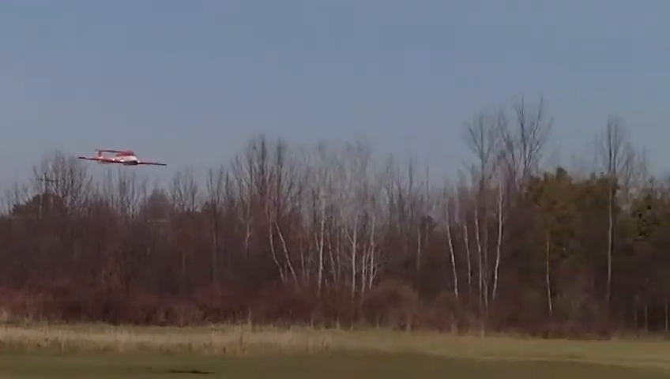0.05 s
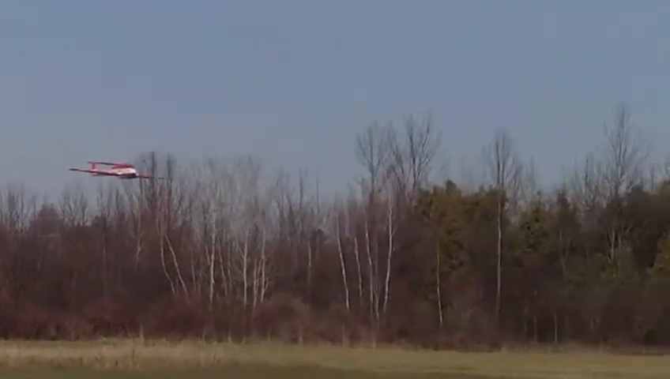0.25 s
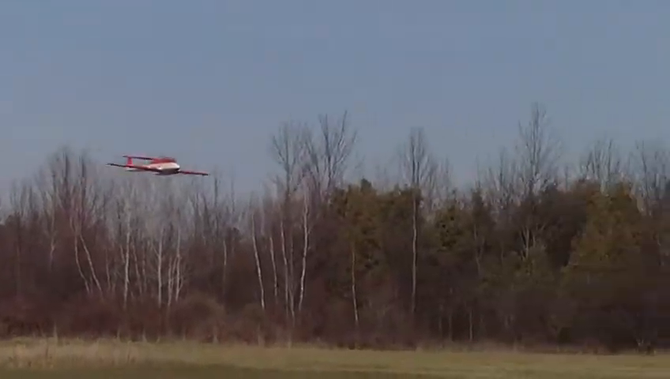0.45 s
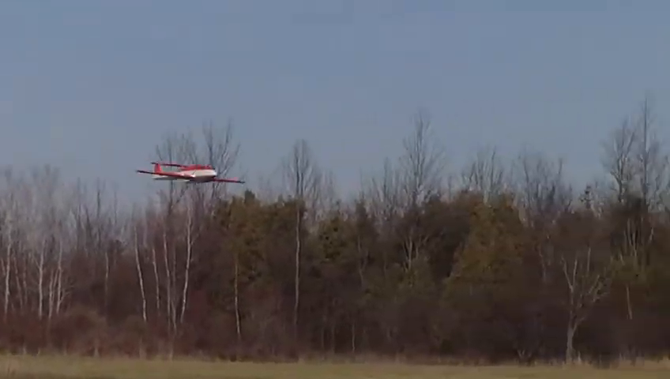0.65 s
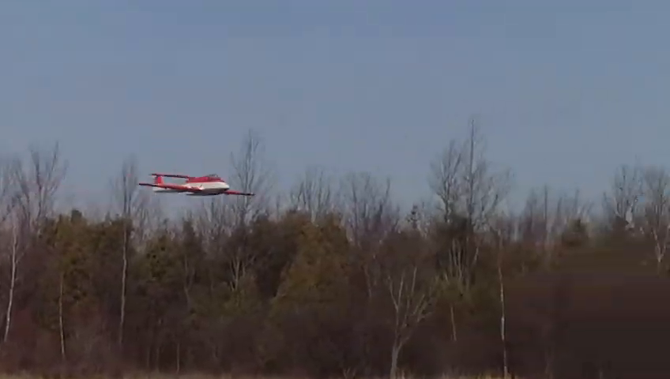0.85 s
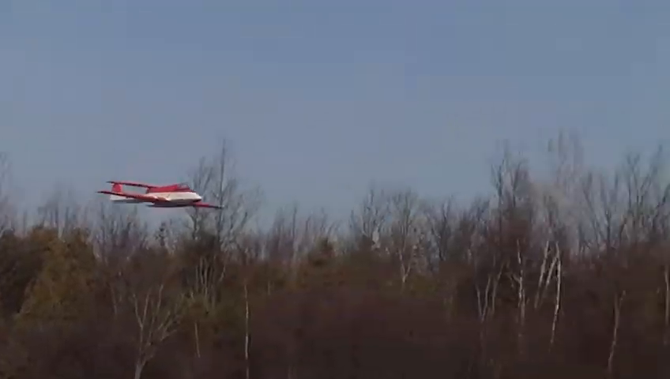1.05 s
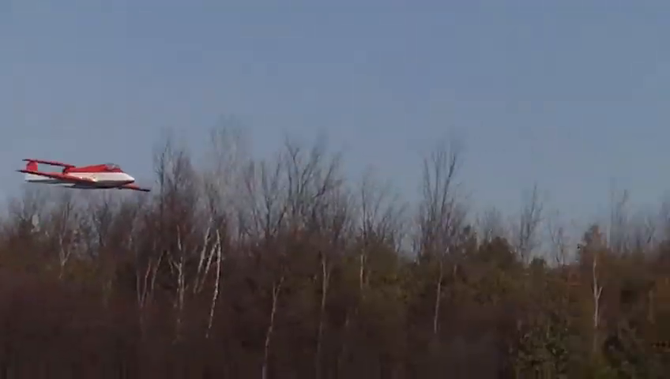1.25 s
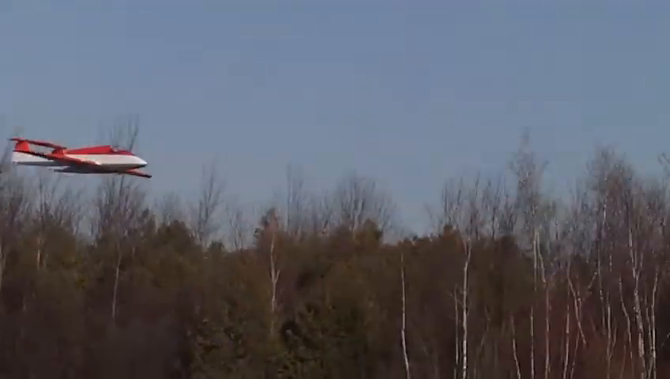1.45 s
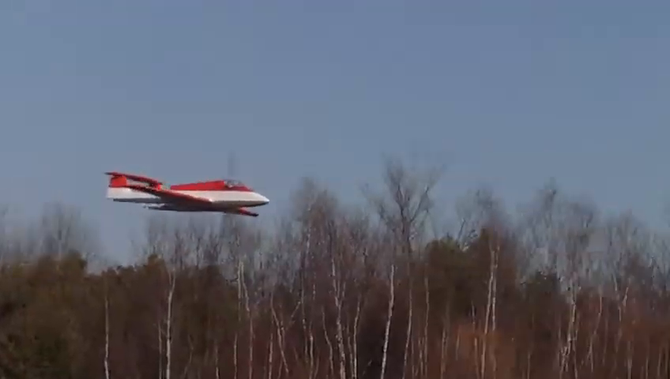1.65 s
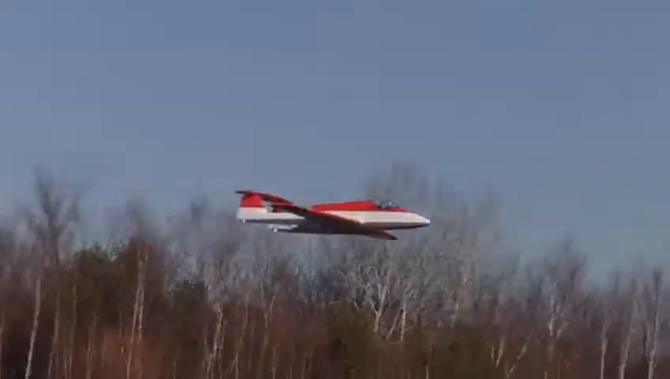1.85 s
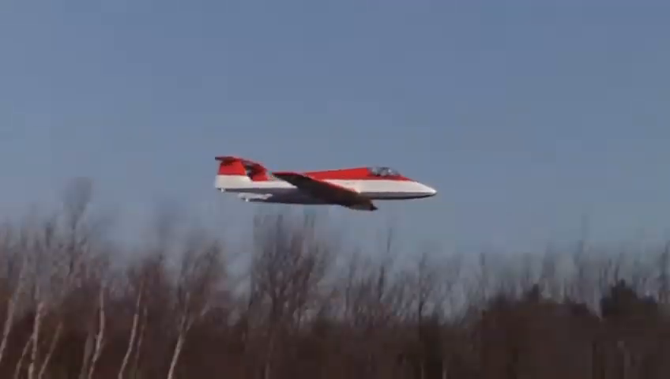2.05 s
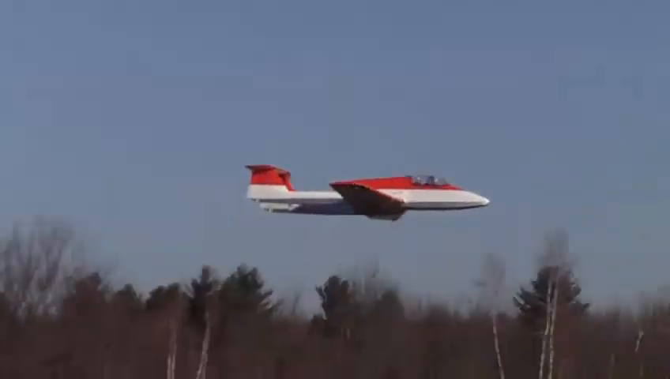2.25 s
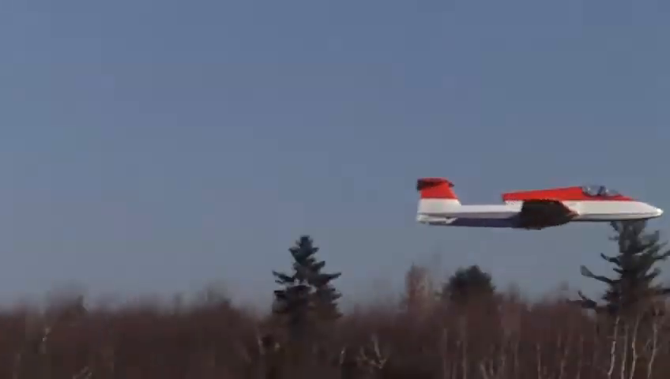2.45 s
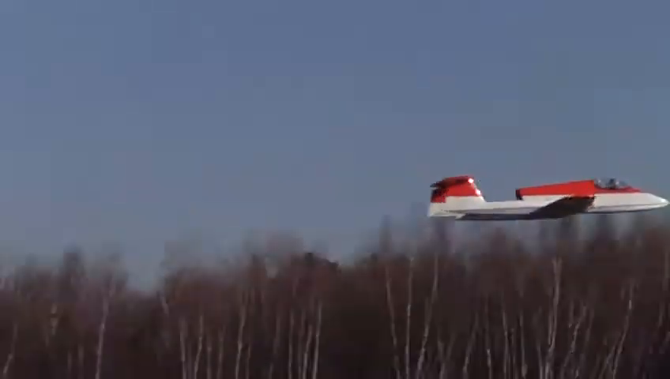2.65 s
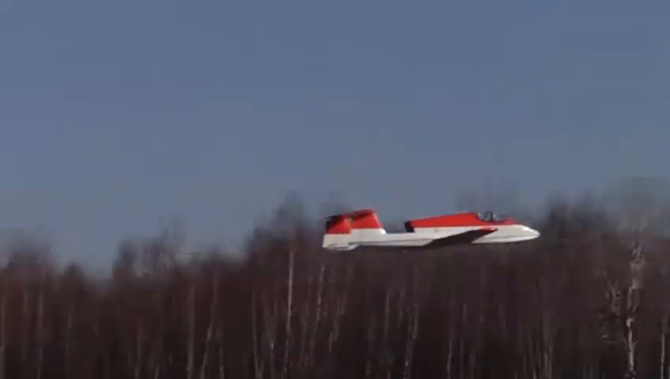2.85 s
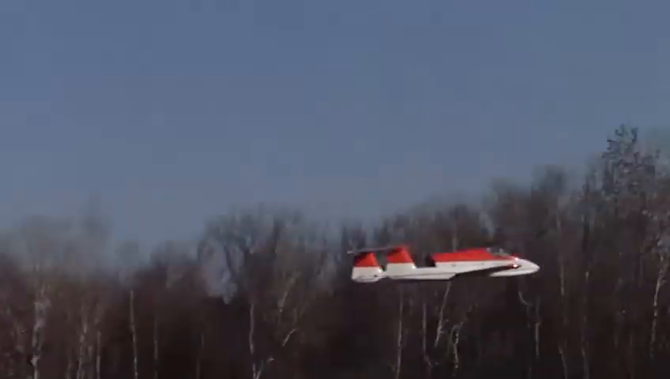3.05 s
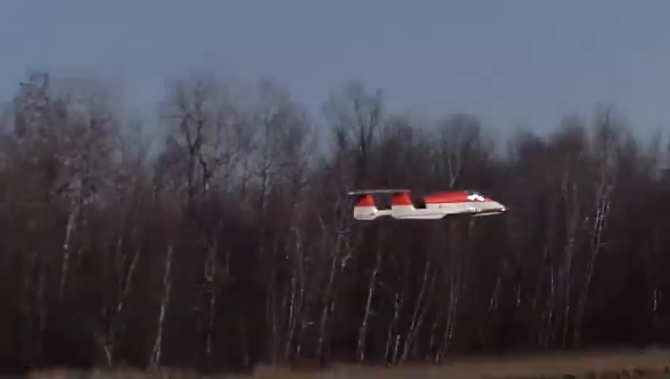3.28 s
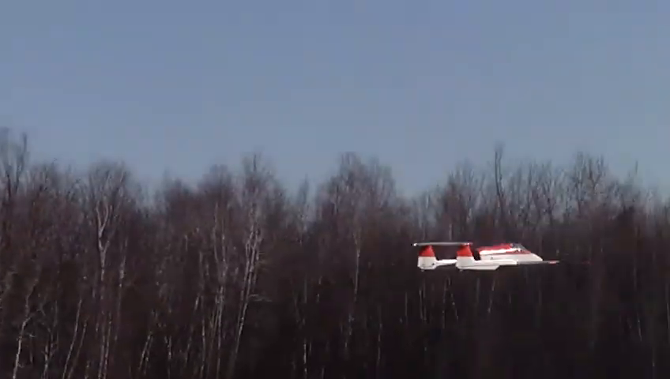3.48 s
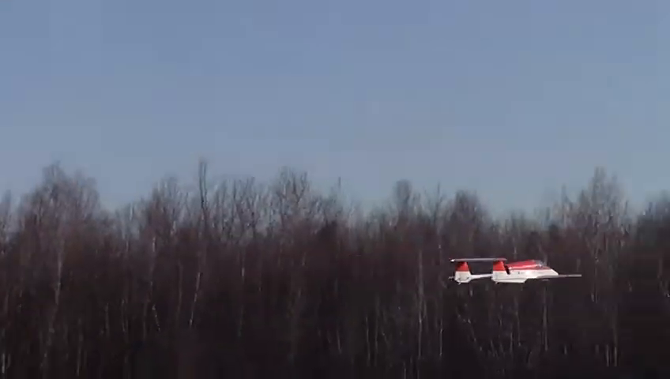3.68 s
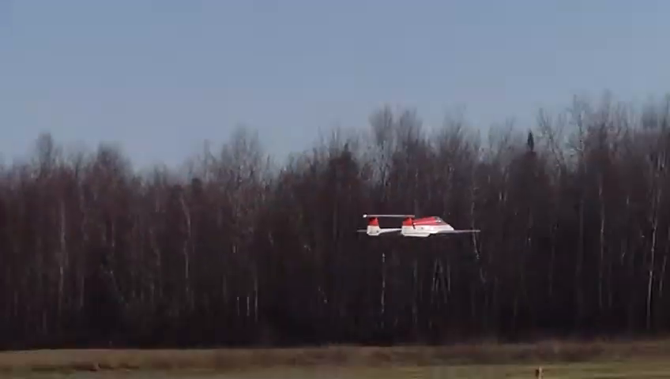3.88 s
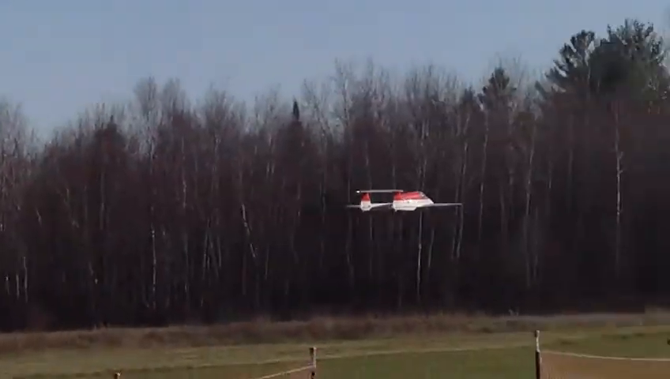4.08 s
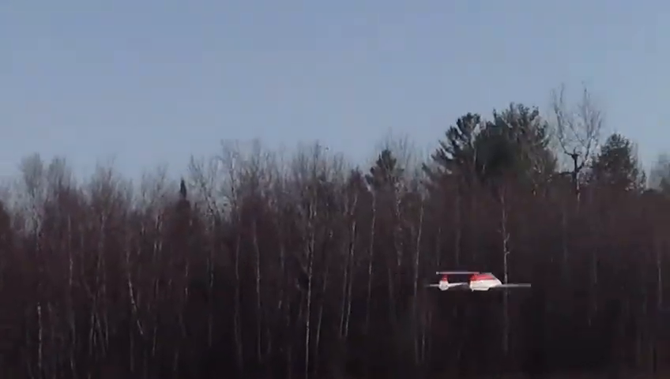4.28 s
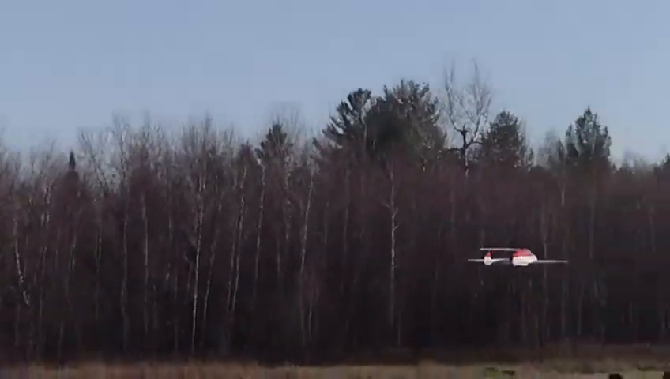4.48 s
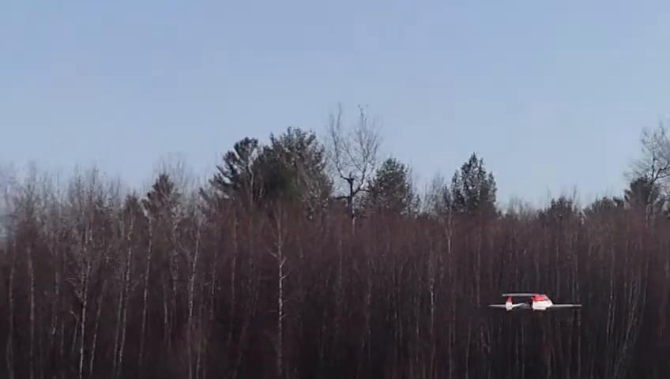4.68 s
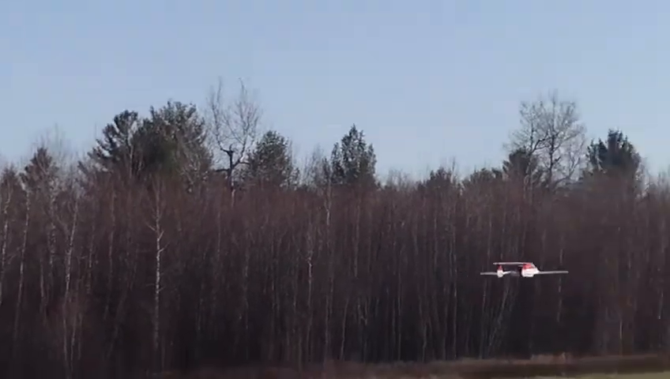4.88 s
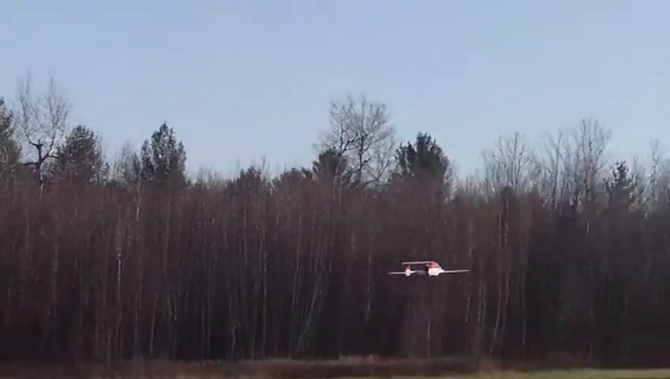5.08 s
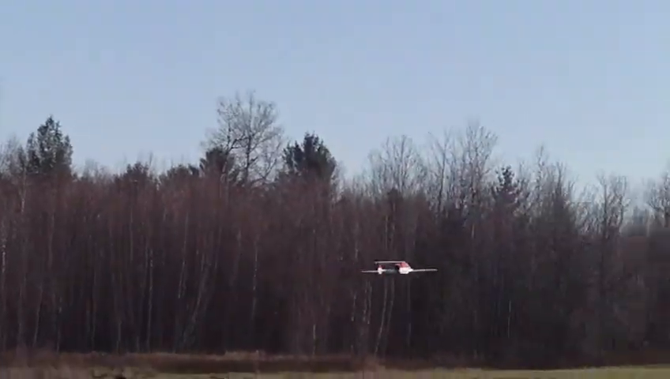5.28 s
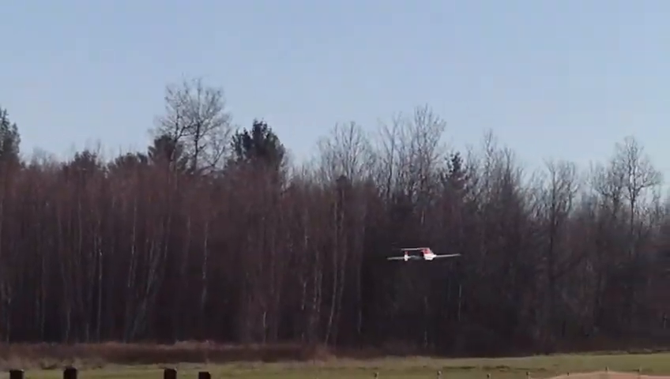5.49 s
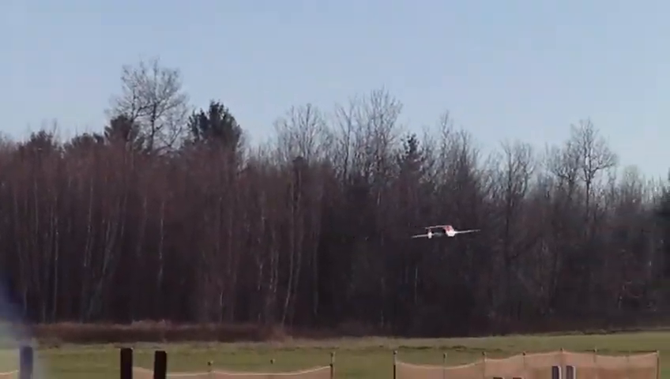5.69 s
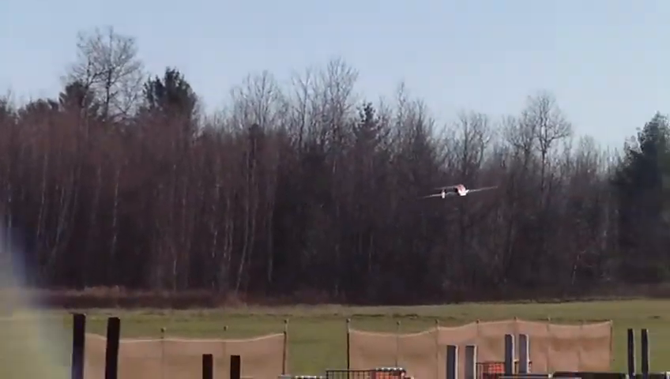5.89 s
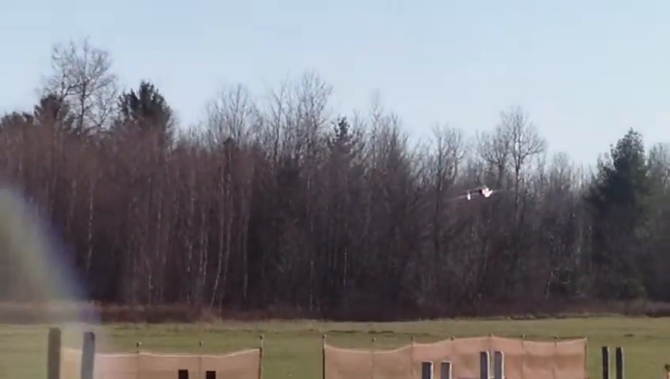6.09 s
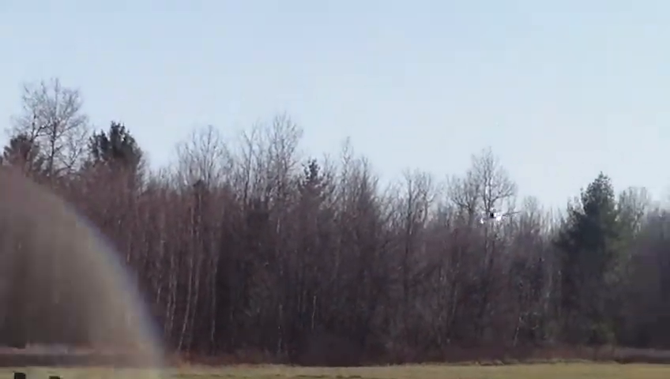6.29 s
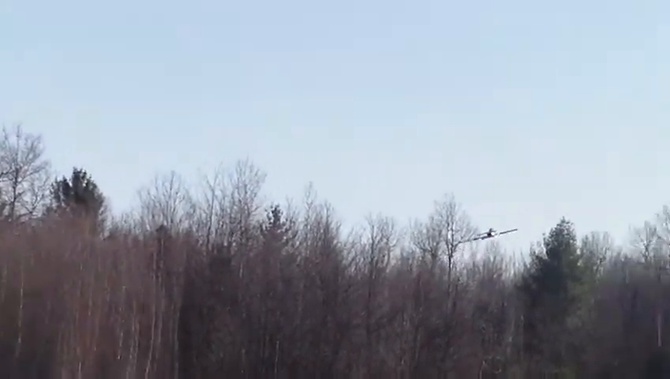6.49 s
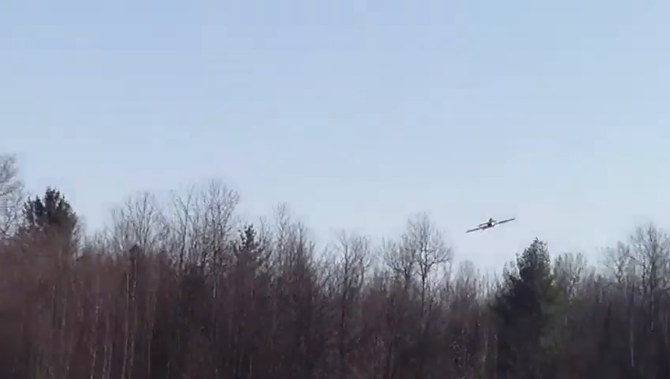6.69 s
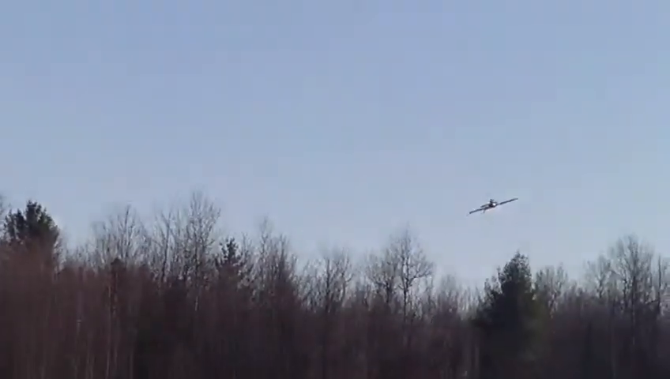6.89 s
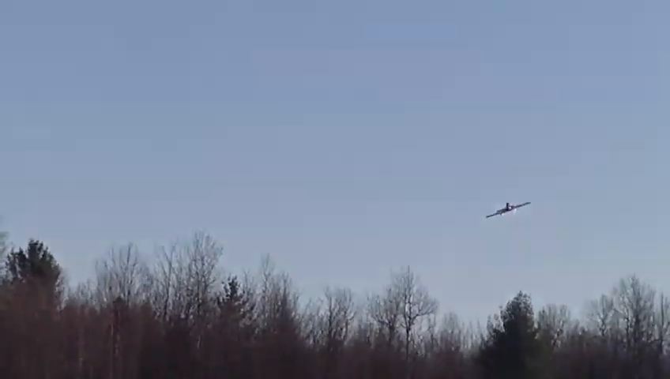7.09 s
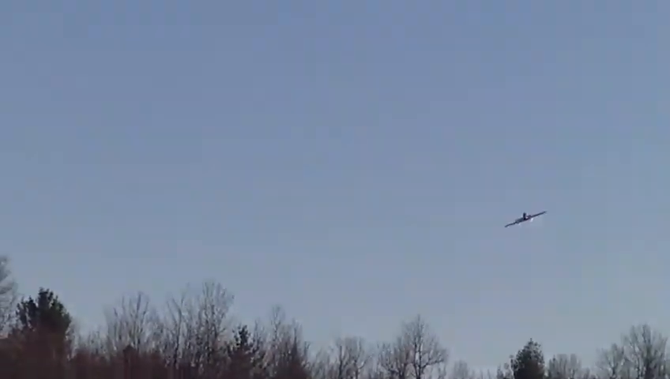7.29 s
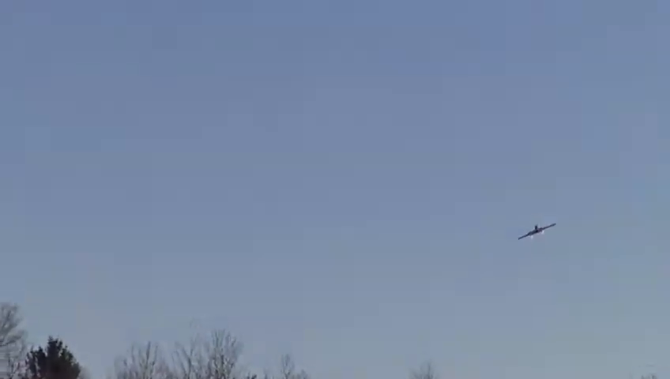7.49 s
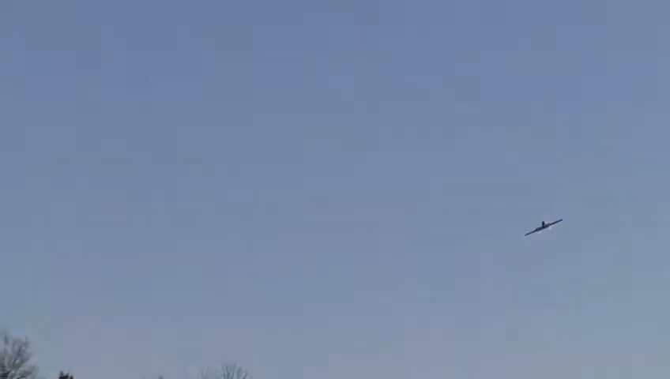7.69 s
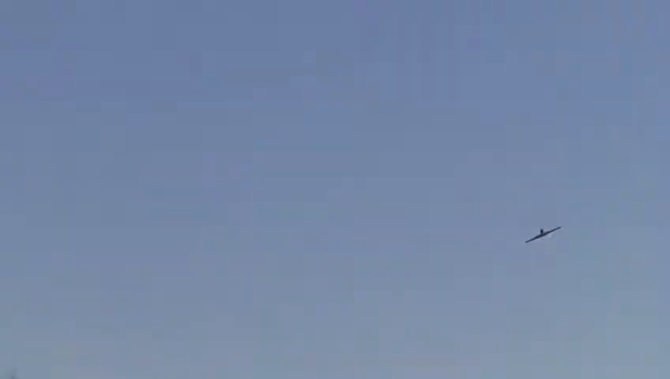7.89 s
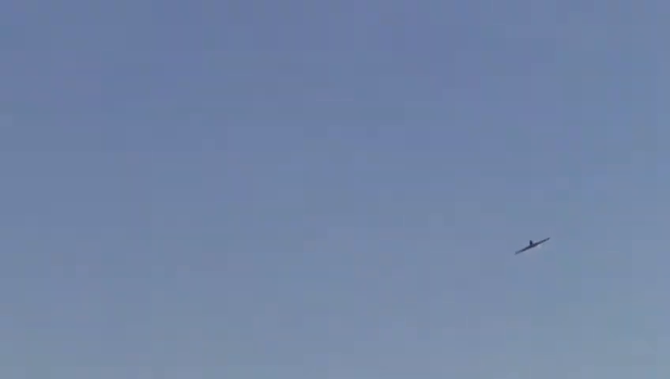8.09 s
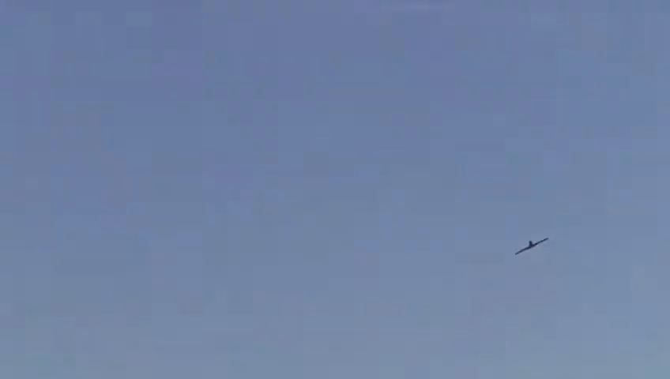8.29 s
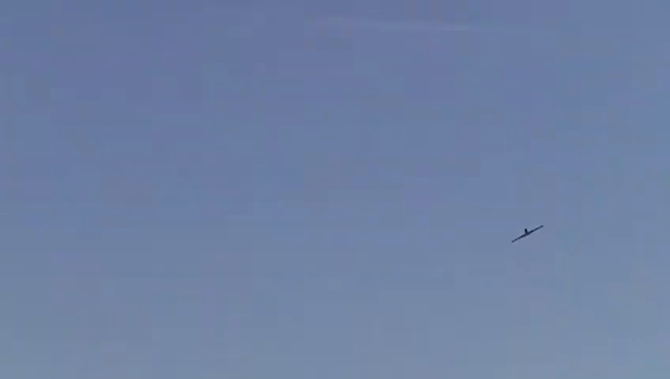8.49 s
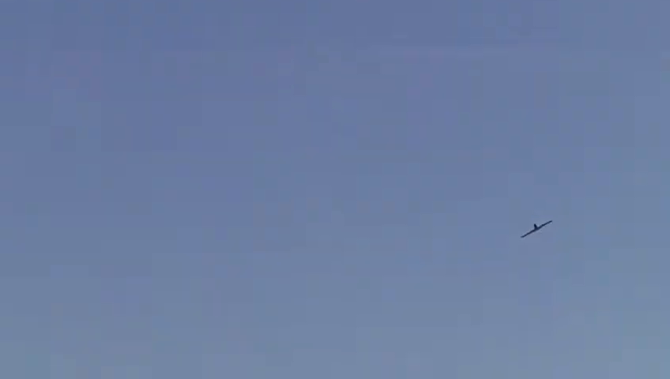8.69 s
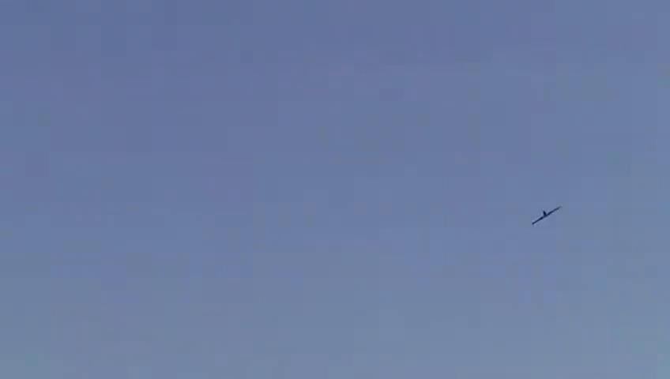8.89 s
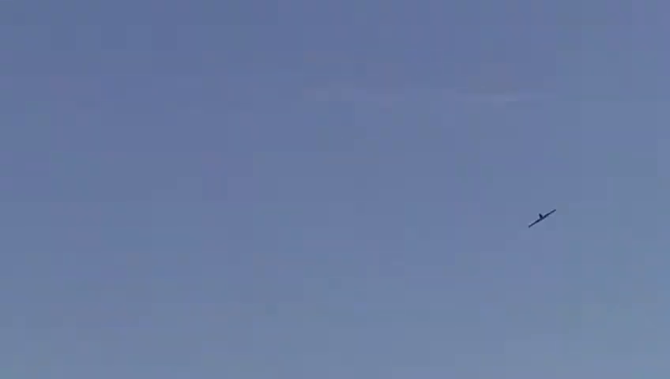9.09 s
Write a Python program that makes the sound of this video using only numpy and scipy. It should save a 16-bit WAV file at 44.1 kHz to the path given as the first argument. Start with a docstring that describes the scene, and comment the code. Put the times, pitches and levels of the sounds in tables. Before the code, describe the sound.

Faint whine swells into a hoarse, hollow jet rush passing close, then recedes to a dull roar among handling ticks and low wind thumps.

```python
"""Over an open field, a model turbine jet makes a low pass and climbs away.
Its exhaust rush is shaped noise that sweeps against its own ground echo; fine hiss comes on top while it is close.
The shaft and the thin compressor whine are sine tones that waver in pitch and strength.
The hand-held camera that follows it ticks as short ringing tones, with soft noise swishes, whistles and hiss.
Wind bumps its microphone as lumpy low noise."""
import sys
import numpy as np
from scipy import signal
from scipy.fft import rfft, irfft, next_fast_len
from scipy.io import wavfile
from scipy.ndimage import uniform_filter1d

SR = 44100
rng = np.random.default_rng(int(sys.argv[2]) if len(sys.argv) > 2 else 0)


def generate_wav(sig):
    """Save sig (samples, or channels by samples) to the path in sys.argv[1] as 16-bit PCM at SR."""
    pcm = np.round(np.clip(np.atleast_2d(sig).T, -1, 1) * 32767).astype(np.int16)
    wavfile.write(sys.argv[1], SR, pcm)


N = 403322


def from_db(db):
    """Decibels to gain."""
    return 10 ** (np.asarray(db) / 20)


def rms_one(x):
    """Scale to unit power."""
    return x / np.sqrt(np.mean(x ** 2) + 1e-20)


def in_time(rows):
    """Draw straight lines between the rows of a curve table; give each column a value at every sample."""
    s, *columns = np.transpose(rows)
    return [np.interp(np.arange(N) / SR, s, c) for c in columns]


def filtered(x, response, size=4096):
    """Apply a gain that is given as a function of frequency; mirrored ends keep the edges quiet."""
    length = next_fast_len(N + 2 * size)
    hz = np.maximum(np.arange(length // 2 + 1) * SR / length, 1)
    padded = np.pad(x, (size, length - N - size), mode="reflect")
    return irfft(rfft(padded) * response(hz), length)[size:size + N]


def noise(colour):
    """Noise of unit power, whose colour table sets only how strong each pitch range is against the others."""
    points_hz, points_db = np.transpose(colour)

    def response(hz):
        return from_db(np.interp(np.log(hz), np.log(points_hz), points_db))

    return rms_one(filtered(rng.standard_normal(N), response))


def drift(rate):
    """Random wander with spread 1; a higher rate (in Hz) makes it quicker."""
    return rms_one(filtered(rng.standard_normal(N), lambda hz: 1 / (1 + (hz / rate) ** 2)))


def levelled(x, size=13001):
    """Even out changes of power that are slower than about 0.3 s."""
    return x / np.sqrt(uniform_filter1d(x ** 2, size) + 1e-20)


def swells(rows):
    """Gain of a set of smooth, bell-shaped swells."""
    t = np.arange(N) / SR
    return sum(from_db(db) * np.exp(-.5 * ((t - s) / length) ** 2) for s, length, db in rows)


def hollows(hz):
    """Bell-shaped dips in the camera's pickup."""
    # Each row: centre in Hz, half width of the bell in Hz, depth in dB
    dips = [(380, 110, -3), (1205, 72, -12.5), (1950, 135, -10), (4450, 90, -5)]
    return from_db(sum(db * np.exp(-.5 * ((hz - centre) / width) ** 2) for centre, width, db in dips))


def over_grass(x, turn, turn_hz, dull_hz, dip_octaves, air_db_per_s=0, rear_db=0):
    """The way across the field: a ground echo combs the sound, and the comb sweeps with the height of the jet."""
    # Lag of the echo behind the direct sound, longer when the jet is higher. Each row: time in seconds, lag in ms
    echo_lag = [(.45, 0.46), (.8, 0.56), (1.2, 0.83), (1.65, 0.95), (1.95, 1.21), (2.5, 1.236), (3.3, 0.93),
                (3.6, 0.64), (5.5, 0.64), (6.8, .61), (7.25, 0.81), (7.65, 1.15), (8.1, 1.217),
                (9.15, 1.64)]
    # The bass dip over soft ground. Each row: time in seconds, centre in Hz, gain in dB (mostly a loss)
    ground_dip = [(0.6, 460, 3), (1.4, 340, -0.5), (2.3, 333, -15.5), (4.0, 422, -1), (7.0, 262, -24),
                  (8.0, 201, 3)]
    echo_strength = .58  # share that the grass returns, before its loss of treble
    scatter_db, scatter_hz = 1.5, 3000  # spread reached far above scatter_hz
    leaving_s = 5.03  # from here on the tail points at the microphone and the jet draws away
    rear_hz, rear_octaves, rear_turn_s = 487, 0.76, 1.5  # the deep throat: centre, width, time to turn

    hz, s, frames = signal.stft(x, SR, nperseg=1024, noverlap=768)
    hz = np.maximum(hz, 1)[:, None]
    at = np.minimum((s * SR).astype(int), N - 1)
    lag_ms, dip_hz, dip_db = (c[at] for c in in_time(echo_lag) + in_time(ground_dip))

    # grass returns the bass upright, the treble turned in phase (by turn, in radians) and weaker
    phase = 2 * np.pi * hz * lag_ms / 10 ** 3 + turn * (1 - np.exp(-hz / turn_hz))
    echo = echo_strength * np.exp(-1j * phase) / np.hypot(1, hz / dull_hz)
    comb = np.abs(1 + echo)
    dip = dip_db * np.exp(-.5 * (np.log2(hz / dip_hz) / dip_octaves) ** 2)

    # eddies scatter the higher sound into slowly changing patches
    patches = rng.standard_normal(frames.shape)
    for _ in range(2):
        patches = uniform_filter1d(patches, size=5, axis=0)
        patches = uniform_filter1d(patches, size=45, axis=1)
    scatter = scatter_db * rms_one(patches) * hz / np.hypot(hz, scatter_hz)

    # treble loss while the jet draws away, stated at 4 kHz
    air = air_db_per_s * np.maximum(s - leaving_s, 0) * (hz / 4000) ** 2
    # the throat goes from rear_db too weak to rear_db too strong as the jet is seen more from behind
    throat = np.exp(-.5 * (np.log2(hz / rear_hz) / rear_octaves) ** 2)
    rear = rear_db * np.tanh((s - leaving_s) / rear_turn_s) * throat
    arriving = frames * comb * from_db(dip + scatter - air + rear)
    return signal.istft(arriving, SR, nperseg=1024, noverlap=768)[1][:N]


def exhaust(shared_db, own_db, flutter_hz):
    """Turbulent jet noise; uneven air makes it flutter, the higher bands most."""
    # Exhaust colour. Each row: frequency in Hz, relative strength in dB per Hz
    exhaust_colour = [(30, -36), (90, -19), (180, -8.5), (500, -7.5), (830, -1), (1300, -5), (1550, -6.5),
                      (2300, -4.5), (2750, 2.5), (3150, .5), (3550, -3.5), (4100, -13.5), (4950, -22.5),
                      (5700, -32.5), (7000, -35.5), (12000, -69)]
    # Deep part of the plume as it arrives, before flutter. Each row: time in seconds, level in dB
    plume_levels = [(0.0, -48), (1.64, -42), (2.47, -35), (3.54, -35.5), (4.93, -41), (5.86, -36),
                    (8.87, -49), (8.95, -52)]
    # The bands above it, before flutter.
    # Each row: time in seconds, low roar in dB, middle rush in dB, high rasp in dB
    exhaust_levels = [(0.0, -45, -42, -45.5), (0.99, -38, -40, -35), (1.25, -37.5, -40, -37),
                      (2.01, -26.5, -27, -28), (2.65, -24, -18.5, -18), (3.05, -22, -19.5, -16),
                      (3.23, -19.5, -21.5, -19), (3.54, -23, -17.5, -20), (3.79, -19, -18.5, -15.5),
                      (3.97, -22.5, -22, -23), (4.15, -21.5, -21, -17), (4.33, -24.5, -26.5, -22.5),
                      (4.87, -25.5, -30, -28.5), (5.35, -20, -24, -22.5), (5.55, -22.5, -30.5, -27.5),
                      (5.65, -21.5, -28, -24), (6.06, -25, -27.5, -27), (6.98, -22, -31.5, -26.5),
                      (7.21, -24, -34, -28.5), (7.62, -28, -26.5, -33), (7.82, -30.5, -25.5, -30),
                      (8.2, -34, -35, -34.5), (8.99, -37.5, -41.5, -45.5), (9.15, -39, -41, -40)]
    # Borders between the four bands, in Hz
    band_edges_hz = [400, 1180, 2000]

    picked_up = filtered(noise(exhaust_colour), hollows)
    rest = over_grass(picked_up, turn=1.9, turn_hz=207, dull_hz=4200, dip_octaves=0.21,
                      air_db_per_s=1.74, rear_db=5.0)
    levels = in_time(plume_levels) + in_time(exhaust_levels)
    shared_air = drift(flutter_hz)
    out = 0
    for k, (edge, level_db) in enumerate(zip([*band_edges_hz, SR], levels)):
        # take the part below the edge, and leave the remainder for the next band
        band = filtered(rest, lambda hz: 1 / (1 + (hz / edge) ** 20))
        rest = rest - band
        flutter_db = shared_db * shared_air + own_db * drift(flutter_hz)
        flutter_db = np.sqrt((k + 1) / len(levels)) * flutter_db
        out = out + levelled(band) * from_db(level_db + flutter_db)
    return out


def hiss(flutter_db, flutter_hz):
    """The top of the jet noise, which carries only over a short way and is mostly swallowed by the grass."""
    # Level before flutter. Each row: time in seconds, level in dB
    hiss_level = [(0.0, -67), (0.51, -63), (0.94, -56.5), (1.91, -54.5), (2.39, -42), (2.65, -36),
                  (2.9, -36.5), (3.21, -36.5), (3.79, -46), (4.69, -56.5), (5.78, -55), (9.15, -71)]
    # Colour of the hiss. Each row: frequency in Hz, relative strength in dB per Hz
    hiss_colour = [(3000, -13), (5000, 1), (5700, -2.5), (6200, -2.5), (6800, -1), (8000, 2.5), (9500, 4.5),
                   (11500, 5), (13000, 3.5), (14500, -0.5), (16000, -4)]
    level_db, = in_time(hiss_level)
    arriving = over_grass(noise(hiss_colour), turn=2.2, turn_hz=220, dull_hz=900, dip_octaves=.24)
    return levelled(arriving) * from_db(level_db + flutter_db * drift(flutter_hz))


def rotor_tone(hz, level_db, waver_hz, waver_rate, fade_db):
    """A tone of the spinning rotor, wavering in pitch and fading in the moving air."""
    phase = 2 * np.pi * np.cumsum(hz + waver_hz * drift(waver_rate)) / SR
    return np.sqrt(2) * np.sin(phase) * from_db(level_db + fade_db * drift(36))


def shaft():
    """The turning shaft sounds one tone on the approach."""
    # Each row: time in seconds, pitch in Hz before waver, level in dB before fading
    shaft_curve = [(0, 1582, -49), (.9, 1605, -51.5), (1.5, 1562, -35), (1.9, 1537, -41), (2.3, 1450, -80)]
    return rotor_tone(*in_time(shaft_curve), waver_hz=6.7, waver_rate=61, fade_db=3.0)


def whine():
    """Two wavering compressor strands while the intake faces the microphone, one steadier line from behind."""
    # The upper strand. Each row: time in seconds, pitch in Hz before waver, level in dB before fading
    whine_curve = [(1.0, 10650, -80), (1.35, 10420, -59), (1.75, 9780, -60), (2.15, 10750, -57),
                   (2.7, 11420, -52), (3.0, 11160, -47), (3.7, 11100, -63), (4.85, 11010, -62),
                   (5.15, 11400, -85)]
    pass_s, turn_away_s = 2.9, .15  # when the jet comes abreast, how quickly its intake then turns away
    front_hz, behind_hz = 110, 24  # how much the upper strand wavers, from the front and from behind
    low_ratio, low_db = .922, -3  # pitch and level of the lower, breathier strand against the upper

    hz, level_db = in_time(whine_curve)
    facing = .5 - .5 * np.tanh((np.arange(N) / SR - pass_s) / turn_away_s)
    waver_hz = behind_hz + (front_hz - behind_hz) * facing
    upper = rotor_tone(hz, level_db, waver_hz, waver_rate=236, fade_db=2.5)
    lower = rotor_tone(hz * low_ratio, level_db + low_db, waver_hz=200, waver_rate=520, fade_db=5.0)
    return upper + facing * lower


def ticks(level_db, scatter_db, spread_s):
    """Each tick rings the small plastic body; sharp ones favour its high modes, firm ones its low modes."""
    # Each row: start in seconds, relative strength in dB, extra brightness in dB per octave from 7 kHz,
    # extra knock of the low modes in dB
    tick_rows = [(0.04, -24.5, 7, -2), (0.6813, -7, -7, -2.5), (.976, -39, 2, -4), (1.2206, -35, 6, -4),
                 (1.7148, -5.5, -2, -5), (2.271, -18.5, -16, -6), (3.3352, -14, 5, 5), (4.1677, -26, 5, -3),
                 (4.3582, -30, 8, -4), (4.4467, -27, -6, -30), (4.507, -22.5, -4, -6), (5.4433, -13, 7, -2),
                 (6.067, -21.5, 7, 5), (6.2302, -33, -7, -6), (7.806, -24.5, 3, 3), (8.59, -48, -2, -6),
                 (8.7989, -48, -2, -8), (8.951, -50, 0, -6)]
    # What the body rings with. Each row: pitch in Hz, relative level in dB, time to fall by 60 dB in seconds
    body_modes = [(1760, -10.5, 0.018), (2890, 0.5, 0.0093), (4260, -10, 0.0016), (5950, -12, 0.0068),
                  (6800, -8, 0.0056), (7700, -10, 0.0052), (9030, -7.5, 0.004), (11100, -11, 0.0052),
                  (12600, -10, .0045), (15000, -22, 0.0036)]
    s, strength_db, bright_db, knock_db = np.transpose(tick_rows)
    chance = rng.standard_normal((len(s), len(body_modes)))
    late = spread_s * rng.random((len(s), len(body_modes)))  # the slip takes a moment to reach every mode
    out = np.zeros(N)
    for k, (hz, mode_db, t60) in enumerate(body_modes):
        touch_db = knock_db if hz < 5000 else bright_db * np.log2(hz / 7000)
        click_db = level_db + strength_db + mode_db + touch_db + scatter_db * chance[:, k]
        clicks = np.full(N, 1e-18)  # far too weak to hear
        clicks[np.round((s + late[:, k]) * SR).astype(int)] = from_db(click_db)
        # a resonator: each click starts a sine that dies away
        decay = from_db(-60 / (t60 * SR))
        step = 2 * np.pi * hz / SR
        out += signal.lfilter([0, np.sin(step)], [1, -2 * decay * np.cos(step), decay * decay], clicks)
    return signal.sosfilt(signal.butter(3, 1500, "high", fs=SR, output="sos"), out)


def swishes():
    """Skin slides on plastic in short, bright strokes."""
    # Each row: middle in seconds, half length of the bell in seconds, peak level in dB
    strokes = [(.42, .04, -65), (1.12, .08, -58), (4.93, .03, -53), (5.234, 0.027, -53), (5.35, .04, -48),
               (5.72, 0.065, -59)]
    # Colour of the strokes. Each row: frequency in Hz, relative strength in dB per Hz
    swish_colour = [(3000, -35), (6000, -11), (9000, 2), (12500, 0), (14000, -9), (16000, -22)]
    return noise(swish_colour) * swells(strokes)


def wind(lump_db, buffet_db, buffet_growth):
    """Eddies push on the microphone in lumps; hard gusts buffet higher up."""
    # Light breeze, freshening late. Each row: time in seconds, level in dB
    breeze = [(0, -44.5), (1.5, -44.5), (2.5, -35.5), (5.4, -39), (6.2, -32.5), (9.15, -28)]
    # Gusts on top of it. Each row: middle in seconds, half length of the bell in seconds, peak level in dB
    gusts = [(.72, 0.051, -31), (.96, 0.12, -32), (2.68, 0.12, -24.5), (2.8, 0.019, -16.5),
             (3.41, .025, -31), (3.83, .025, -28), (4.35, .04, -30), (6.22, 0.066, -20.5),
             (6.6, 0.039, -23.5), (6.87, 0.13, -21.5), (7.44, .025, -24), (7.87, .06, -30), (8.2, .08, -28),
             (8.81, 0.031, -25), (9.05, .03, -25.5)]
    # Colour of the rumble. Each row: frequency in Hz, relative strength in dB per Hz
    wind_colour = [(6, -28), (15, 16), (28, -2.5), (50, -4), (100, -16.5), (200, -48.5), (400, -24.5),
                   (1000, -76)]
    # Colour of the hard gusts. Each row: frequency in Hz, relative strength in dB per Hz
    buffet_colour = [(30, -15), (70, 4.5), (140, -6.5), (280, -13.5), (600, -63)]
    breeze_db, = in_time(breeze)
    push = np.hypot(from_db(breeze_db), swells(gusts))
    lumpy = noise(wind_colour) * from_db(lump_db * drift(9.5))
    rumble = levelled(lumpy) * push
    # buffeting grows faster than the push itself
    buffet = noise(buffet_colour) * from_db(buffet_db) * push ** buffet_growth
    return rumble + buffet


def electronics(hiss_db):
    """Faint steady whistles and hiss inside the camera."""
    # Each row: pitch in Hz, level in dB
    whistle_rows = [(7865, -78), (12845, -84)]
    t = np.arange(N) / SR
    whistles = sum(np.sqrt(2) * from_db(db) * np.sin(2 * np.pi * hz * t) for hz, db in whistle_rows)
    return whistles + from_db(hiss_db) * rng.standard_normal(N)


def scene():
    """The jet out over the field, and the small noises at the camera."""
    jet = exhaust(shared_db=0.75, own_db=0.67, flutter_hz=5.8) + hiss(flutter_db=1.67, flutter_hz=35)
    handling = ticks(level_db=4.5, scatter_db=0.5, spread_s=.0006) + swishes()
    breeze_and_gusts = wind(lump_db=4.5, buffet_db=4.5, buffet_growth=1.85)
    camera = breeze_and_gusts + handling + electronics(hiss_db=-68)
    return (jet + shaft() + whine() + camera)[None]


def record(dry):
    """The highest peaks are rounded and the top is cut."""
    cutoff_hz = 15950
    rounded = dry[0] / (1 + dry[0] ** 6) ** (1 / 6)
    # the cut slopes down over 200 Hz
    return filtered(rounded, lambda hz: np.clip((cutoff_hz - hz) / 200 + .5, 0, 1))[None]


dry = scene()
out = record(dry)
generate_wav(out)
```